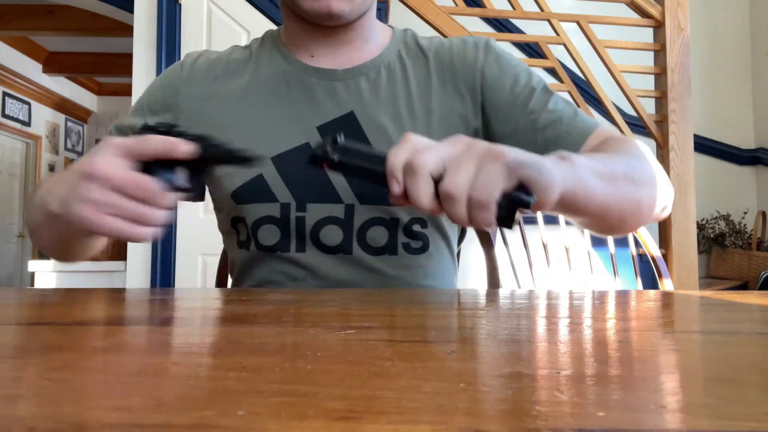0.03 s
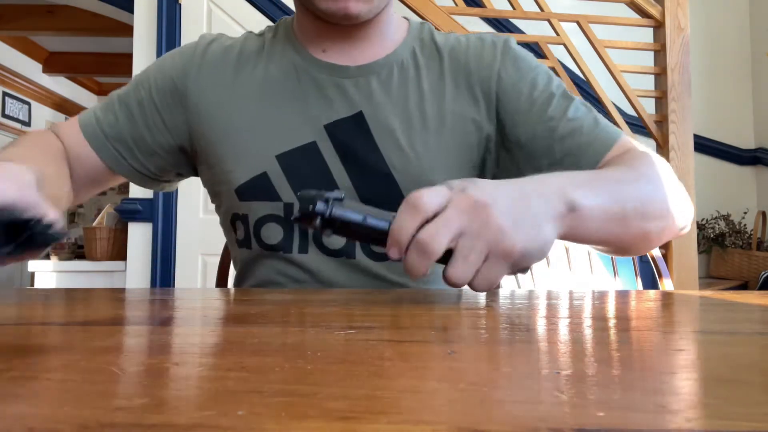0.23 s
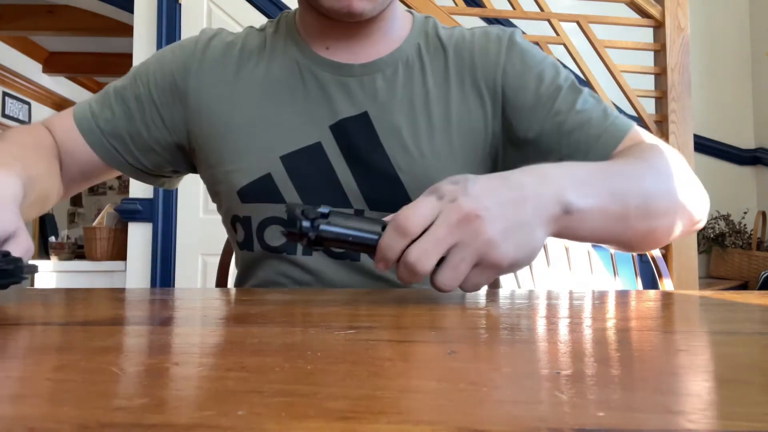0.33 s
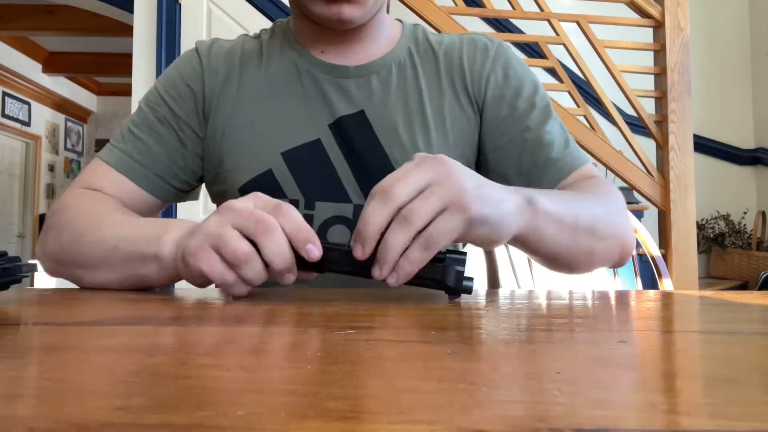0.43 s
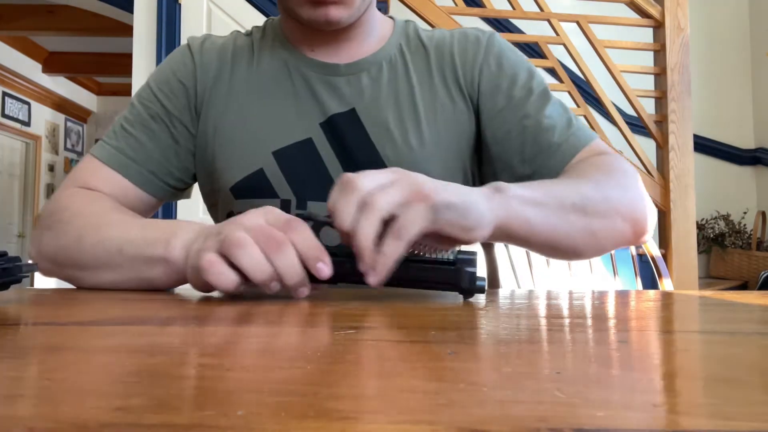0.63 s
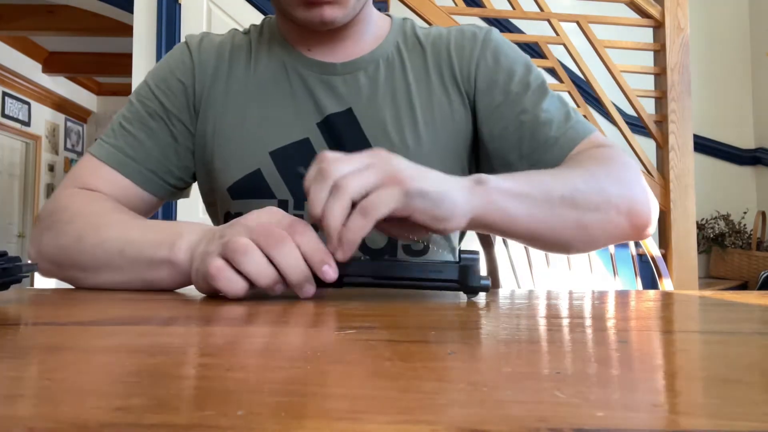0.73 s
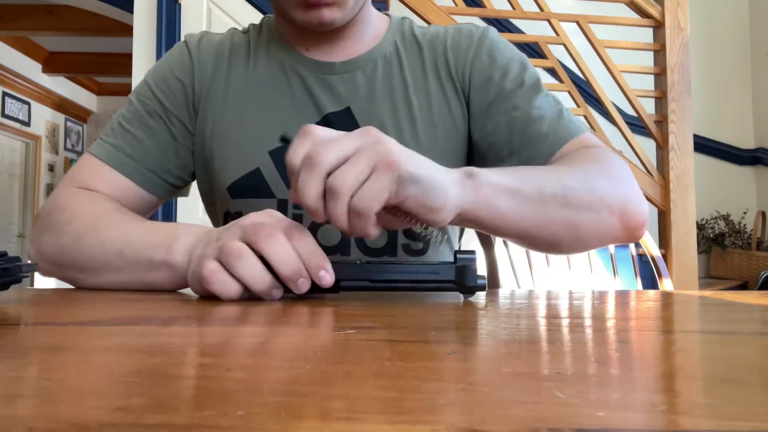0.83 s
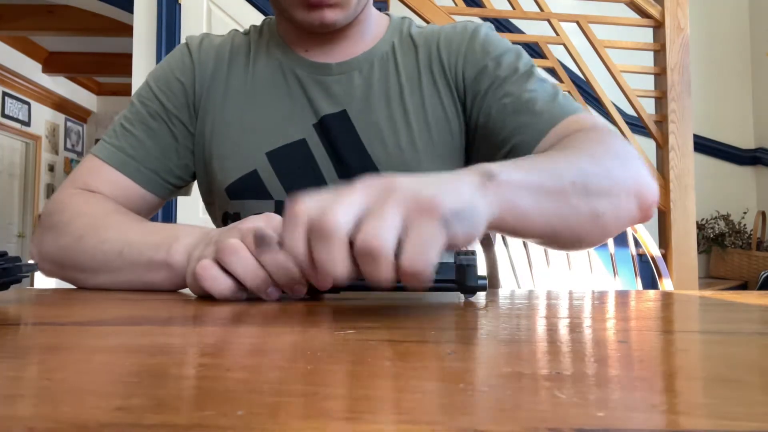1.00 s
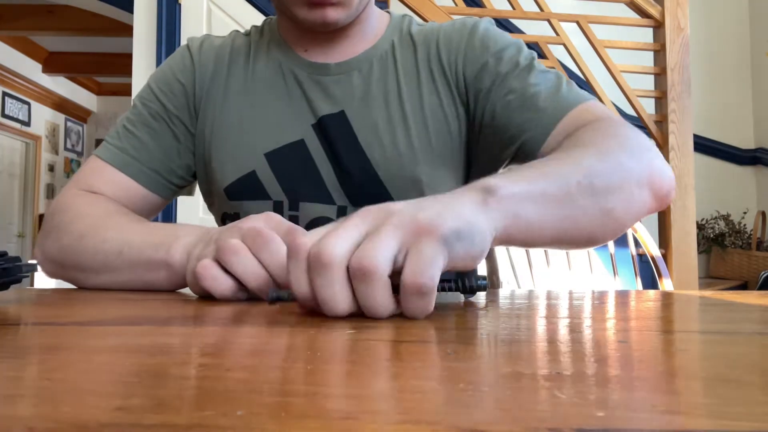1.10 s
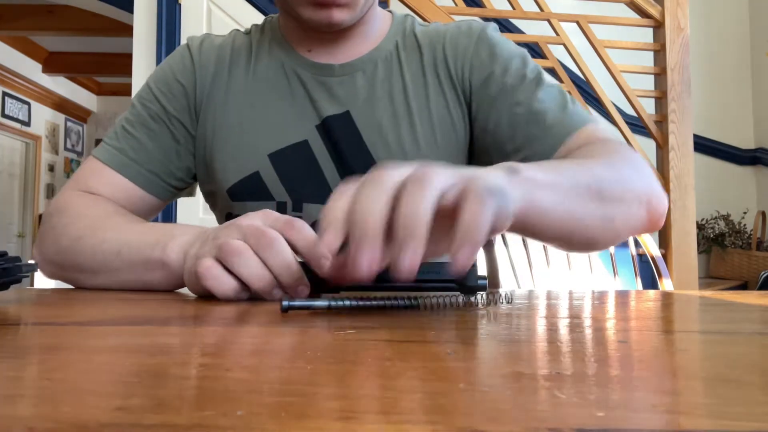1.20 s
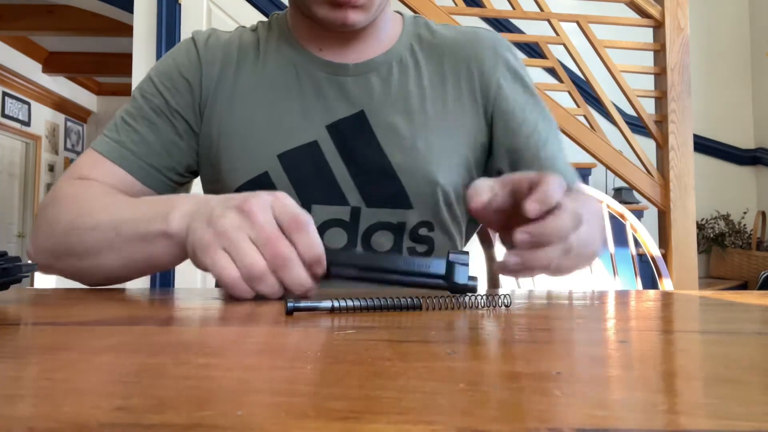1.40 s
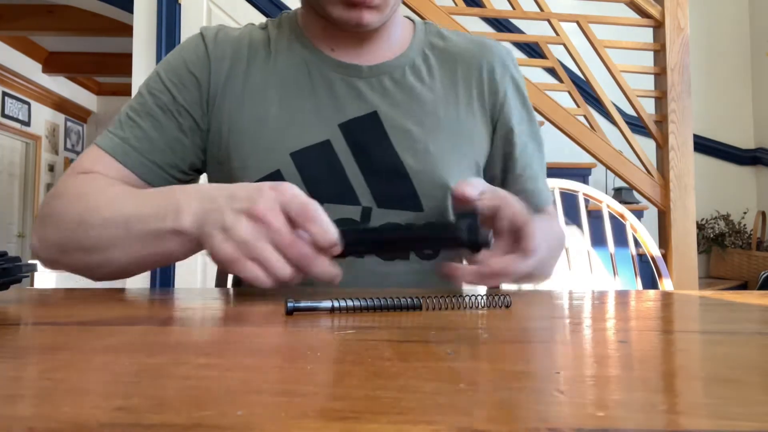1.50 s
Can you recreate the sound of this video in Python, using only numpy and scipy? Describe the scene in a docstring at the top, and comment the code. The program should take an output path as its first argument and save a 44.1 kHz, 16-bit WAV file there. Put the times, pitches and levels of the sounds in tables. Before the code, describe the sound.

Metal handgun parts are set down on a wooden table indoors, close to the microphone: a few ringing knocks, a thud with steel chatter, a bouncing rattle from the spring and rod, and one last soft tap over low room hum.

```python
"""A pistol is taken apart on a wooden table, close to a stereo microphone standing on the same top.
Over the hum of a furnished room the frame lands and rocks, ringing the wood; the level dips briefly.
The slide is set down with a thud and bright steel chatter. Then the spring and its rod drop and rattle.
One last soft knock, and the level dips again. Every contact gets a short room tail."""
import sys
import numpy as np
from scipy import signal
from scipy.fft import rfft, irfft, next_fast_len
from scipy.io import wavfile
from scipy.ndimage import uniform_filter1d

SR = 44100
rng = np.random.default_rng(int(sys.argv[2]) if len(sys.argv) > 2 else 0)


def store_wav(level_fs):
    """Save 16-bit WAV to argv[1]."""
    pcm = np.round(np.clip(np.atleast_2d(level_fs), -1, 1) * 32767)
    wavfile.write(sys.argv[1], SR, pcm.T.astype(np.int16))


N = 68355
T = np.arange(2 * SR // 5) / SR  # time within one hit

# Room tone spectrum: f/Hz, relative level/dB
HUM_SPECTRUM = [(18, -68), (30, -31), (193, -12.5), (253, -3.5), (316, -14), (423, -4.5), (691, -9),
                (883, -8.5), (1800, -16.5), (1940, -12.5), (2240, -19.5), (10500, -42.5), (13600, -46),
                (22000, -120)]
# Stereo image of the room tone: f/Hz, left-right correlation
HUM_IMAGE = [(60, 1), (380, -0.31), (2380, -0.38), (15000, 0.57)]
# Parts landing on the table: t/s, body level/dB, body f/Hz, body width/octaves, body decay factor,
# knock level/dB, knock f/Hz, position left of centre/m
TABLE_HITS = [(0.2395, -10.5, 338, 0.71, 0.61, -0.5, 1620, 0.46),
              (0.241, -11, 187.8, 0.23, 0.63, -13.5, 7160, 0.44),
              (0.241, -8.5, 590, 0.36, 0.32, -15, 2650, 0.425),
              (0.3291, -11.5, 307, 1.07, 0.25, -9, 1050, 0.5083),
              (0.3295, -7.5, 1080, 0.48, 0.43, -15.5, 7400, 0.44),
              (0.3600, -18, 598, 0.52, 0.47, -25, 5240, 0.83),
              (0.375, -41, 600, 0.56, 0.38, -32, 5250, 0.61),
              (.4990, -26.5, 191, 0.87, 1.34, -52, 2430, 0.25),
              (0.507, -28.5, 260, 0.92, 0.71, -18.5, 1820, -0.015),
              (0.559, -42.5, 90, 1.3, 2.1, -51, 2000, -0.16),
              (.6745, -12.5, 227, 0.9, 0.31, -28.5, 2400, .1),
              (0.685, -24.5, 136, 1, 1.29, -28, 1550, 0.04), (0.7395, -58, 686, 0.7, 0.2, -42, 1200, 0),
              (0.878, -56, 59, 0.26, 0.15, -72, 1000, 0), (0.9468, -49.5, 114, 0.68, 3.3, -42, 2380, 0),
              (.9700, -45, 95, 0.49, 0.58, -40, 2500, 0.11),
              (1.0327, -41, 891, 1.1, 0.87, -42, 1570, 0.075),
              (1.046, -34, 895, 2.8, 0.46, -21.5, 3500, -0.18),
              (1.0730, -12, 880, 1.19, 0.77, -9, 1720, 0.0077),
              (1.0996, -16, 863, 1.15, 0.59, -3, 1670, -0.092),
              (1.1190, -27, 895, 0.59, 2.6, -10, 1880, -0.029),
              (1.1392, -19, 840, 1.33, 0.85, -15.5, 1640, -0.011),
              (1.1570, -11.5, 880, 0.79, 0.44, -32, 1700, -0.23),
              (1.167, -25, 914, 0.41, 2, -14.5, 1700, -0.081),
              (1.177, -22, 1056, 0.024, 2.8, -15.5, 1600, -0.183),
              (1.198, -30, 1140, 0.025, 2.44, -19.5, 1680, -0.068),
              (1.4310, -54, 800, 0.93, 0.24, -34, 2200, 0.102), (1.438, -37.5, 70, 1.4, 0.28, -67, 5900, 0)]
# Modes of the table top: f/Hz, level/dB, base t60/s
WOOD_MODES = [(62.8, 3.5, 0.27), (107.9, -10, 0.35), (152.1, -9.5, 0.42), (174, 1.5, 0.069),
              (206.7, 2.5, 0.097), (258.1, -4, 0.34), (300, 2, 0.099), (376.8, 3, 0.15), (503.5, 0, 0.06),
              (519, -6.5, 0.44), (600.4, -7.5, 0.33), (690.4, 3.5, 0.086), (798, -1, 0.042), (876, 3, 0.02),
              (927, 0, 0.11), (1118.4, 10.5, 0.043), (1218, 2, 0.017), (1278, -6, 0.14), (1424, 0.5, 0.071),
              (1500, 9, 0.037), (1713, -1.5, 0.15), (1805, -1.5, 0.064), (1970, 12, 0.038),
              (2170, -25, 0.055), (2364, 6, 0.082), (2624, 2, 0.044), (3540, 2.5, 0.026)]
# Modes of the slide and spring: f/Hz, level/dB, base t60/s
STEEL_MODES = [(3720, -9.5, 0.14), (4490, -7.5, 0.24), (5290, 0.5, 0.062), (6150, -7.5, 0.15),
               (7340, 12, 0.013), (8160, 3, 0.037), (8490, -1, 0.023), (8800, -7.5, 0.085),
               (9240, -6.5, 0.1), (10220, 6, 0.1), (10800, -3, .05), (14500, -10, .04), (15600, -23, .04)]
# Parts dragging or rattling: t/s, length/s, level/dB, f/Hz, width/octaves, grain rate/(1/s)
SCRAPES = [(.342, 0.031, -34, 677, 0.75, 950), (0.413, 0.2, -51.5, 300, 1.59, 1580),
           (0.491, 0.011, -47, 7360, 2.4, 6300), (0.502, 0.027, -41.5, 9400, 0.4, 3300),
           (0.504, 0.034, -45.5, 4600, 0.22, 3100), (0.526, 0.14, -59, 8000, 2, 3800),
           (0.949, 0.043, -55, 236, 0.7, 390), (1.033, 0.13, -43.5, 1080, 0.94, 1100),
           (0.501, 0.11, -53, 15200, 0.07, 1700), (1.034, 0.23, -62, 5630, 0.53, 4800),
           (1.104, 0.17, -50.5, 144, 0.093, 170)]
# Steel on steel: t/s, ring level/dB, f/Hz, width/octaves, decay factor, attack/ms, snap level/dB
STEEL_CLICKS = [(0.3533, -37, 8450, .1, .2, .1, -46), (0.354, -42, 8170, 0.02, 4.4, 7, -53),
                (0.4957, -21, 8000, 1, 0.18, .1, -41), (0.5078, -14, 7000, .6, 0.27, 0.22, -25),
                (0.52, -23, 8400, .2, 0.61, 1, -41), (0.5567, -46, 9000, .1, 0.5, .1, -61.5),
                (0.574, -40.5, 9100, .1, 0.81, .1, -60), (.597, -44, 8870, .05, 0.51, .5, -63),
                (0.618, -38, 6170, 0.13, 0.32, .1, -60), (0.619, -33.5, 14500, 0.44, 0.19, 0.12, -30),
                (.6240, -46, 3840, 0.072, 0.27, 3, -65), (0.6836, -34.5, 7100, 0.106, 2, 0.63, -61),
                (0.6824, -31.5, 4100, 0.79, 0.29, 0.36, -34), (0.723, -60, 4540, .06, 1.13, 3.7, -59),
                (1.0371, -38.5, 9640, .04, 3, 0.21, -34), (1.0542, -26, 10300, 0.049, 0.59, 0.69, -51),
                (1.073, -57, 10300, 0.03, 0.29, 1, -50), (1.0971, -31.5, 9000, 1, 0.58, .1, -24.5),
                (1.112, -35.5, 10300, .03, 1.44, 0.81, -32), (1.144, -35, 10400, 0.036, 1.37, 2.7, -51),
                (1.4316, -56, 5800, 0.52, .2, .1, -54)]
# Decay of the room tail: f/Hz, t60/s
TAIL_DECAY = [(60, 0.5), (250, 0.62), (1000, 0.41), (3000, 0.45), (10000, 0.22)]
# Colour of the room tail: f/Hz, level/dB
TAIL_EQ = [(700, 0.5), (1800, -4.5), (6000, -2)]
# Microphone colour, on top of all levels above: f/Hz, level/dB
MIC_EQ = [(15, -38), (50, 16.5), (10700, 5.5), (11300, 4.5), (12200, -16), (13300, 7), (16000, -8)]
# Brief dips in the whole mix: t/s, fade out/s, fade in/s, level/dB
LEVEL_DIPS = [(0.402, 0.03, 0.01, -23), (1.504, 0.048, 0.027, -25.5)]

MONO_HZ = 210  # below this, room tail and travel through the wood narrow towards mono


def amp(db):
    return 10 ** (np.asarray(db) / 20)


def unit_rms(x):
    return x / np.sqrt(np.mean(x ** 2) + 1e-20)


def curve(points, hz):
    """Read (f, value) points on a log frequency axis."""
    f, value = np.transpose(points)
    return np.interp(np.log(hz + 1), np.log(f + 1), value)


def bell(hz, centre_hz, octaves):
    """Gain of a bell-shaped band."""
    return np.exp(-.5 * (np.log2((hz + 1) / centre_hz) / octaves) ** 2)


def filtered(x, response):
    """Apply a complex frequency response."""
    size = next_fast_len(x.shape[-1] + SR // 4)
    return irfft(rfft(x, size) * response(np.fft.rfftfreq(size, 1 / SR)), size)[..., :x.shape[-1]]


def place(out, start_s, sound):
    """Mix a sound in; it is choked at the next level dip."""
    end_s = min([dip[0] for dip in LEVEL_DIPS if dip[0] > start_s] + [N / SR])
    part = out[:, round(start_s * SR):round(end_s * SR)]
    part[:, :sound.shape[1]] += sound[:, :part.shape[1]]


def room_hum():
    """A wide, faintly mottled noise bed, with extra air until the first dip."""
    spectrum = signal.stft(rng.standard_normal((2, N + 512)), nperseg=512)[2]
    patches = uniform_filter1d(uniform_filter1d(rng.standard_normal(spectrum.shape[1:]), 6, 0), 10, 1)
    noise = signal.istft(spectrum * amp(1.6 * unit_rms(patches)), nperseg=512)[1][:, :N]
    width = lambda f: np.arccos(curve(HUM_IMAGE, f)) / 2
    mid, side = filtered(noise, lambda f: amp(curve(HUM_SPECTRUM, f)) * [np.cos(width(f)), np.sin(width(f))])
    bed = amp(-54.5) * unit_rms(np.array([mid + side, mid - side]))
    air = filtered(bed, lambda f: (amp(8.5) - 1) * bell(f, centre_hz=8950, octaves=0.17))
    return bed + air * (np.arange(N) < LEVEL_DIPS[0][0] * SR)


def ring(modes, centre_hz, octaves, decay=1, attack_s=1e-4, waver_rad=0, hard=False):
    """Struck modes ring out in stereo; neighbours start opposed, or together for a hard tap."""
    hz, db, t60 = np.transpose(modes)[..., None, None]
    scatter = rng.standard_normal((3, len(modes), 2, 1))
    gain = bell(hz, centre_hz, octaves) * amp(db + 2 * scatter[0, :, :1])
    polarity = 0 if hard else np.pi * np.arange(len(modes))[:, None, None]
    drift = waver_rad * rng.standard_normal((len(modes), 1, len(T))).cumsum(2) if waver_rad else 0
    spread = scatter[2] * bell(hz, centre_hz=392, octaves=1)  # widest in the low mids
    attack = (1 - np.exp(-T / attack_s)) * (1 - np.exp(-T * hz / 0.17))  # low modes bloom later
    envelope = attack * amp(-60 * T / (t60 * decay))
    waves = gain * envelope * np.sin(2 * np.pi * hz * T + polarity + drift + spread)
    return waves.sum(0) / np.linalg.norm(gain)


def snap(t60, hz, octaves):
    """The contact transient: a short burst of coloured noise."""
    noise = filtered(rng.standard_normal(len(T)), lambda f: bell(f, hz, octaves))
    burst = noise * amp(-60 * T / t60) * (1 - np.exp(-2 * T * hz)) ** 2
    return burst / np.abs(burst).max()


def table_hits():
    """A landing part knocks and rings the top; bending waves carry the treble to the microphone first."""
    out = np.zeros((2, N))
    resting_steel = [(mode[0], 0, 0.037) for mode in STEEL_MODES]  # damped, rings along in the knock
    for start_s, db, hz, octaves, decay, knock_db, knock_hz, left_m in TABLE_HITS:
        knock = ring(WOOD_MODES + resting_steel, knock_hz, octaves=0.4, decay=0.25, hard=True) / 3
        knock += 0.23 * snap(t60=44 / knock_hz, hz=knock_hz, octaves=0.4)
        hit = amp(db) * ring(WOOD_MODES, hz, octaves, decay) + amp(knock_db) * knock
        bend = 0.16 + 1.163 * abs(left_m)  # phase lag in radians per root Hz
        side = 0.4575 * left_m * np.array([[-.5], [.5]])  # the nearer channel leads
        lag = lambda f: (bend + side / (1 + (MONO_HZ / (f + 1)) ** 3)) * np.sqrt(f)
        arrival = filtered(hit, lambda f: np.exp(-1j * lag(f)))
        place(out, start_s, with_room(arrival))
    return out


def with_room(x, wet_db=-9.5, predelay_s=.004):
    """The room answers with a diffuse tail, each frequency dying at its own speed."""
    hz, t, spectrum = signal.stft(rng.standard_normal((2, SR // 2)), SR, nperseg=256)
    tail = signal.istft(spectrum * amp(-60 * t / curve(TAIL_DECAY, hz)[:, None]), SR, nperseg=256)[1]
    mono_blend = lambda f: 0.22 + 0.78 / (1 + (f / MONO_HZ) ** 4)
    tail += filtered((tail[::-1] - tail) / 2, mono_blend)
    impulse = filtered(tail, lambda f: amp(curve(TAIL_EQ, f))) / np.linalg.norm(tail[0])
    delayed = np.pad(x, ((0, 0), (round(predelay_s * SR), 0)))
    wet = signal.fftconvolve(delayed, impulse, axes=1)
    return np.pad(x, ((0, 0), (0, wet.shape[1] - x.shape[1]))) + amp(wet_db) * wet


def scrapes():
    """Grains of tiny, irregular contacts excite wood and steel, fading over the stroke."""
    out = np.zeros((2, N))
    for start_s, length_s, db, hz, octaves, rate in SCRAPES:
        chance, size = rng.random((2, len(T)))
        progress = T / length_s
        fade = np.sqrt(np.clip(1 - progress, 0, 1)) * amp(progress)
        grains = (chance < rate / SR) * amp(-3 * np.log(size + 0.077)) * fade
        body = ring(WOOD_MODES + STEEL_MODES, hz, octaves, decay=0.38)
        body += 1.5 * snap(0.0045 + 3 / hz, hz, octaves)
        stroke = signal.fftconvolve(grains[None], body, axes=1)[:, :len(T)]
        rms = np.sqrt(np.mean(stroke[:, T < length_s] ** 2) + 1e-12)
        place(out, start_s, with_room(amp(db) * stroke / rms))
    return out


def steel_clicks():
    """Steel parts strike each other: a snap and a thin, wavering ring."""
    out = np.zeros((2, N))
    lag_s = np.array([[0], [27e-6]])  # the right channel hears it just later
    for start_s, db, hz, octaves, decay, attack_ms, snap_db in STEEL_CLICKS:
        tone = amp(db) * ring(STEEL_MODES, hz, octaves, decay, attack_ms / 1000, waver_rad=0.066)
        click = tone + amp(snap_db) * snap(.005, hz, octaves)
        arrival = filtered(click, lambda f: np.exp(-2j * np.pi * f * lag_s))
        place(out, start_s, with_room(arrival))
    return out


def scene():
    """Wood and steel foley over the room tone."""
    return table_hits() + steel_clicks() + scrapes() + room_hum()


def record(dry, ceiling=.97, knee=8, top_hz=16500):
    """A warm microphone with a dull top, soft clipping, two level dips and a high cut."""
    x = filtered(dry, lambda f: amp(curve(MIC_EQ, f)))
    x = x / (1 + np.abs(x / ceiling) ** knee) ** (1 / knee)
    for at_s, out_s, in_s, db in LEVEL_DIPS:
        x *= np.interp(np.arange(N) / SR, [at_s - out_s, at_s, at_s + in_s], [1, amp(db), 1])
    return filtered(x, lambda f: f < top_hz)


dry = scene()
out = record(dry)
store_wav(out)
```